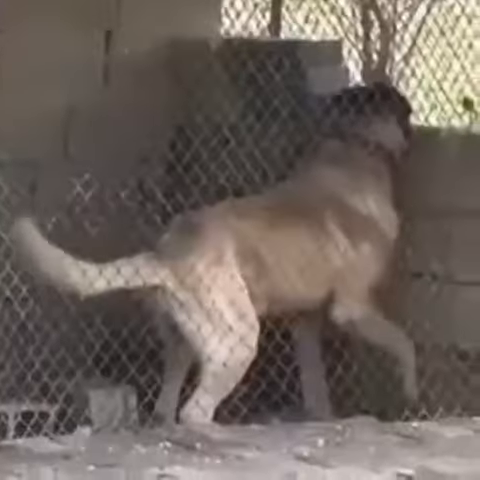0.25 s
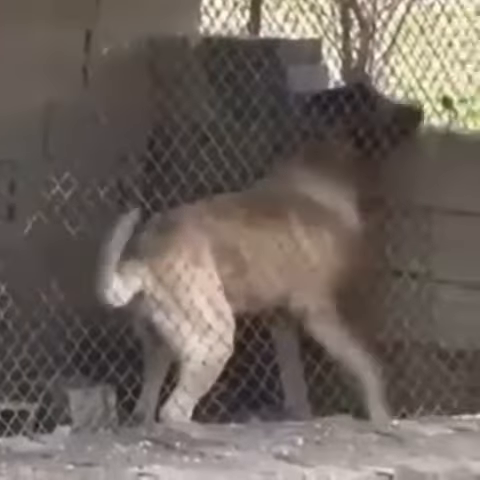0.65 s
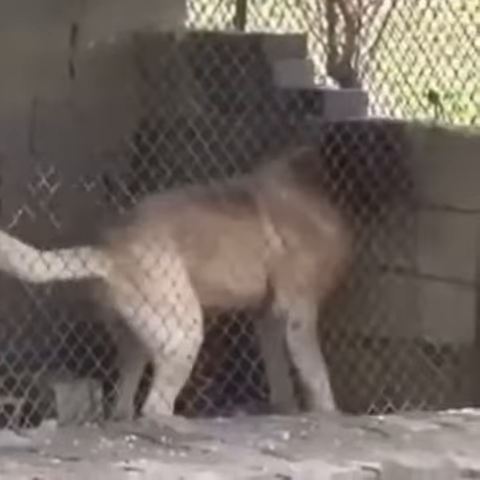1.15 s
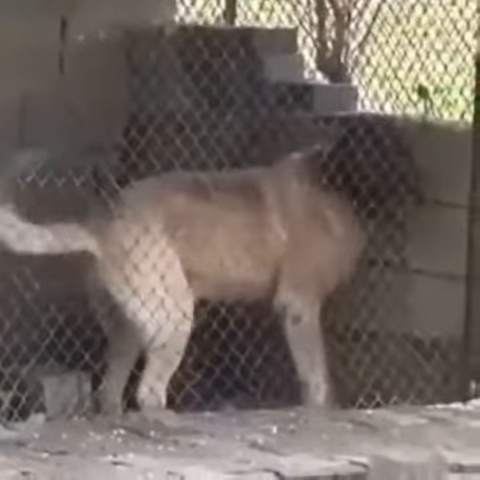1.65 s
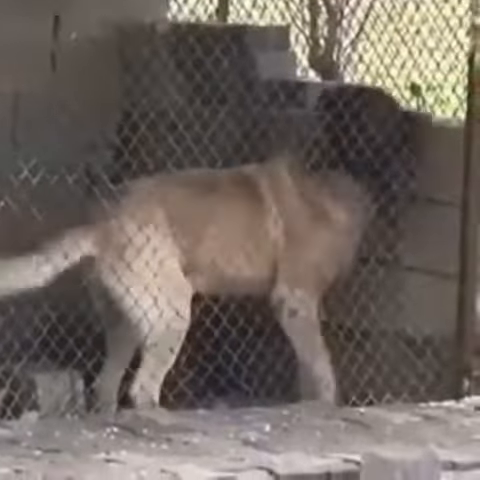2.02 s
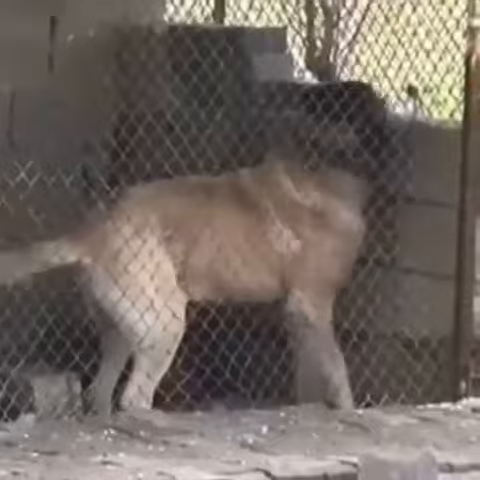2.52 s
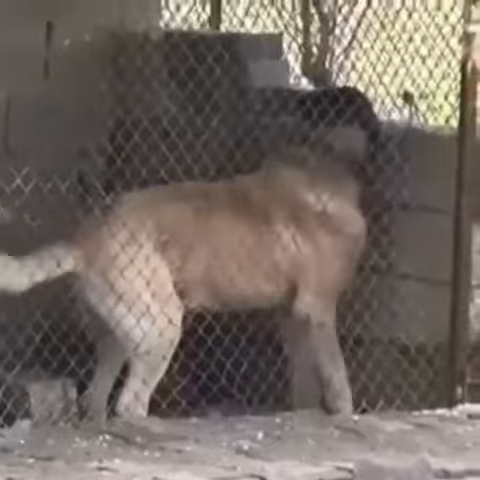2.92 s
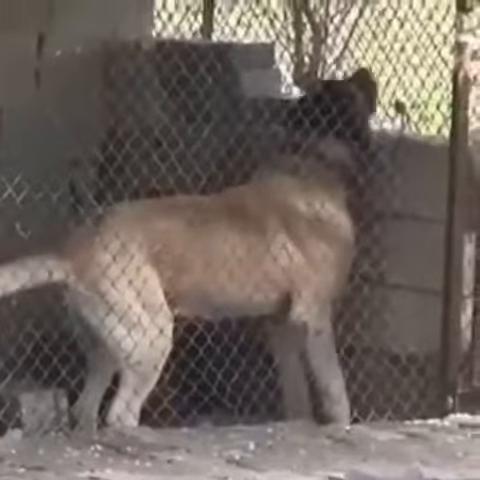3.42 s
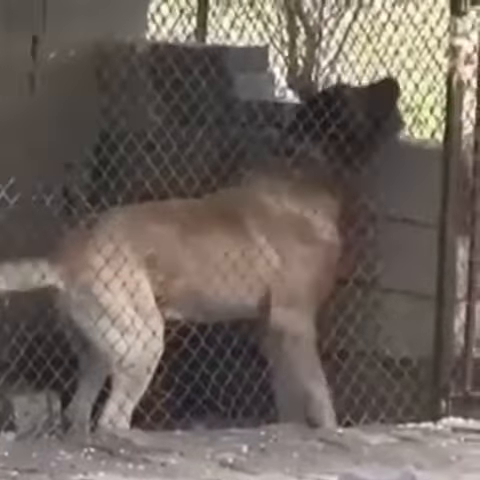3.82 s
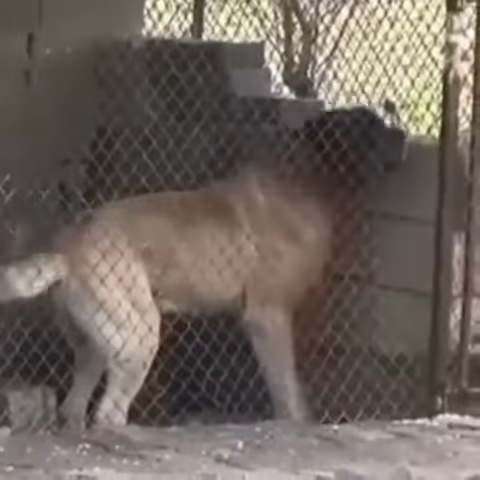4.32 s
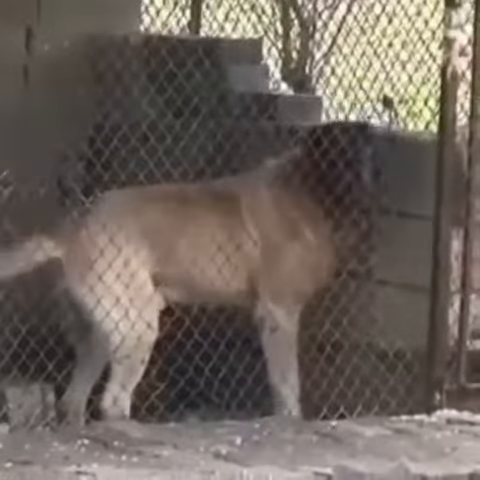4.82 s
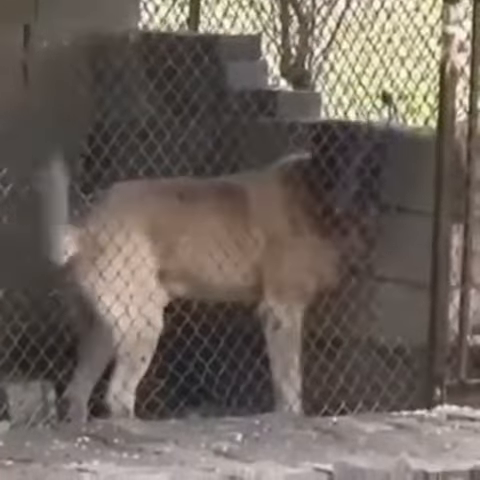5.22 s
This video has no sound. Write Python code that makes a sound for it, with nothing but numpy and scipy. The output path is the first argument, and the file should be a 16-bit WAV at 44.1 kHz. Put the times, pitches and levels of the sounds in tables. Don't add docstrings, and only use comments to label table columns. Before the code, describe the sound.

A thump and soft scuffing steps open over low distant traffic, then a tiny yip. A big dog begins barking, gruff and well spaced at first, then two barks close together and two more. From the middle on a second dog cries in gliding high whines, sometimes two-toned. Thin nose whistles, bird chirps and sharp fence ticks sit between, in an echoing outdoor pen heard through a simple handheld microphone.

```python
import sys
import numpy as np
from scipy import signal
from scipy.fft import rfft, irfft, next_fast_len
from scipy.io import wavfile
from scipy.ndimage import uniform_filter1d, map_coordinates

SR = 44100
rng = np.random.default_rng(int(sys.argv[2]) if len(sys.argv) > 2 else 0)


def level_to_linear(level):
    exponent = np.asarray(level, float) / 20
    return 10 ** exponent


def materialize(psi):
    bounded = np.clip(np.atleast_2d(psi).T, -1, 1)
    quanta = np.round(bounded * 32767).astype(np.int16)
    wavfile.write(sys.argv[1], SR, quanta)


N = 240697

# (frequency [Hz], level [dB per Hz])
RASP = [(1590, -44.5), (2700, -14.5), (3020, -4.5), (3440, -11.5), (3610, -0.5), (3950, -8.5), (4510, -1),
        (5110, -13), (9230, -13.5), (10700, -6.5), (13000, -14.5)]


def barks():
    # (chest cycles per fold pulse [1], pulse scatter [0-1], noise share [0-1],
    # undertone over chest [dB])
    voicing = [(3, 0.6, 1, -6.5), (3.5, 0.1, 0.72, -12.5), (3.3, 0.05, 0.37, -27), (3.3, 0.5, 0.8, -14),
               (3, 0.36, 0.5, -33), (4.4, 0.3, 0.71, -4), (3.9, 0.1, .65, -15), (3, 0.6, 0.7, -15)]
    # (full voice from [s], hold [s], chest level [dB], swell over the hold [dB], chest note [Hz])
    bark_table = [
        (0.837, 0.087, -20, 0.5, 329.3),
        (1.593, 0.091, -20, -2.5, 350.5),
        (2.273, 0.089, -18, -2, 368.8),
        (3.033, 0.084, -22.5, 1.5, 368),
        (3.548, 0.1, -26.5, 18, 316.4),
        (3.844, 0.086, -22.5, -6.5, 332.5),
        (4.644, .092, -22, -1, 348.2),
        (5.2, 0.091, -22.5, 14, 345.7),
    ]
    # (mouth level [dB], swell over the hold [dB], snout over mouth [dB],
    # jaw resonance [Hz], its fall over the hold [Hz])
    jaw_table = [(-25.5, 6, -15, 625, 6), (-22, 1, -15, 700, 60), (-23.5, 0, -3.5, 760, 191),
                 (-23, 8, -12.5, 670, 17), (-33.5, 16, -4.5, 660, 1), (-25, 2.5, -13.5, 620, 0.5),
                 (-22, -3, -9.5, 660, 19.5), (-26, -2.5, -17, 745, -42.5)]
    # (frequency [Hz], level [dB])
    mouth = [(500, 0.5), (620, 5.5), (770, -0.5), (880, -17.5)]
    # (frequency [Hz], level [dB])
    snout = [(1030, 3.5), (1230, 6), (1410, 6), (1620, -2.5), (1850, -14.5), (2240, -8.5)]
    # (frequency [Hz], level [dB])
    throat = [(3620, -7), (4250, 0), (4550, -1)]
    # (frequency [Hz], level [dB per Hz])
    hiss = [(420, -44.5), (520, 6.5), (800, 1.5), (1100, -1), (1500, -10), (1900, -33), (2600, -33),
            (3200, -57)]
    wander = 0.036
    over_db = -2

    out = np.zeros(N)
    for bark, opening, (cycles, scatter, share, under_db) in zip(bark_table, jaw_table, voicing):
        controls = bark_controls(bark, opening)
        start, gate, (hz, chest_db, mouth_db, snout_db, rasp_db, jaw_hz) = call(controls, release=0.03)
        size = len(gate)

        chest = turns(hz * (1 + wander * share * wobble(size, 25.6)))
        folds = chest / cycles + 2 * np.pi * scatter * wobble(size, 90)
        pulses = np.diff(np.floor(folds / (2 * np.pi)), prepend=0).clip(0, 1)
        pulses = pulses * level_to_linear(1.3 * wobble(size, 150))
        puffs = (12 + np.cos(folds)) * level_to_linear(3.9 * wobble(size, 56.6))
        air = unit(puffs * rng.standard_normal(size))
        source = np.sqrt(1 - share) * unit(pulses) + np.sqrt(share) * air

        chest_gain = level_to_linear(1.5 * np.cos(folds) + 1.8 * share * wobble(size, 70))
        chest_tone = np.sqrt(2) * chest_gain * np.sin(chest + 1.1 * share ** 2 * wobble(size, 60))
        under = fuzzy(hz * (1 - 1 / cycles), size, drift=0.015, blur=1.72 * share, flicker_db=2.5)
        over = fuzzy(hz * (1 + 1 / cycles), size, drift=0.019, blur=1.52 * share, flicker_db=3.5)
        voice = chest_tone + level_to_linear(under_db) * under + level_to_linear(under_db + over_db) * over

        throb = 1 + 0.5 * np.cos(folds)

        def bands(modes):
            lines = [level_to_linear(db) * fuzzy(centre, size, drift=0.035, blur=0.3 + (centre / 1500) ** 2, flicker_db=3)
                     for centre, db in modes]
            return unit(throb * sum(lines))

        jaw = fuzzy(jaw_hz, size, drift=0.022, blur=0.7, flicker_db=2)
        bed = unit(filtered(source, lambda f: level_to_linear(along(hiss, f))))
        rasp = unit(filtered(air, lambda f: level_to_linear(along(RASP, f)))) + level_to_linear(-4.5) * bands(throat)
        upper = level_to_linear(-6) * bands(mouth) + level_to_linear(-4) * jaw + level_to_linear(-7) * bed
        upper += level_to_linear(snout_db - 5.5) * bands(snout) + level_to_linear(rasp_db) * rasp
        out[start:start + size] += gate * (level_to_linear(chest_db) * voice + level_to_linear(mouth_db) * upper)
    return band(out, 224, 11000)


def bark_controls(bark, opening):
    s, hold, db, swell_db, hz = bark
    mouth_db, mouth_swell_db, snout_db, jaw_hz, fall_hz = opening
    edges = (0.058, 36.5, 0.073, 34)
    t, chest = note(s, hold, db, swell_db, edges)
    early, mouth = note(s - 0.0074, hold, mouth_db, mouth_swell_db, edges)
    times = np.sort(np.r_[t, early[1:3]])
    edge = np.array([1, 0, 0, 1])
    shapes = [
        (t, hz - 15.8 * edge),
        (t, chest),
        (early, mouth),
        (t, snout_db + 4 * edge),
        (t, -32.5 + 9 * edge),
        (t, jaw_hz + fall_hz * np.array([1, 1, -1, -1]) / 2),
    ]
    return np.transpose([times] + [np.interp(times, *shape) for shape in shapes])


def whines():
    tone, phase, gain = high_oscillator()
    return tone + low_oscillator(phase, gain)


def high_oscillator():
    # (time [s], pitch [Hz], effort [dB], octave over the first partial [dB])
    whine_table = [
        [(3.7, 903, -39, 6), (3.735, 780, -33, -18), (3.802, 770, -47.5, -5), (3.86, 1100, -59.5, 3.5),
         (3.895, 1154, -25, -18.5), (3.956, 1166, -20.5, -12.5), (4.0, 1134, -35.5, -25), (4.05, 886, -57.5, 5),
         (4.1, 838, -63, 6)],
        [(4.09, 829, -69.5, -13), (4.134, 895, -54, 7), (4.21, 1107, -47.5, -17), (4.244, 1145, -31.5, -14),
         (4.29, 1119, -33.5, -13), (4.326, 1077, -54.5, -7), (4.366, 1008, -50, -5.5), (4.55, 1038, -58, 3),
         (4.67, 1136, -48, -5)],
        [(4.66, 1129, -46.5, -2.5), (4.87, 1106, -38, -22.5), (4.99, 1004, -50, -16.5), (5.085, 995, -50, -18),
         (5.125, 975, -44.5, 4.5), (5.21, 900, -35.5, -7.5), (5.265, 861, -27, -37.5), (5.36, 721, -45.5, -3.5),
         (5.41, 708, -73, 5.5)],
    ]
    bright_table = [-7, 2, 1]
    # (frequency [Hz], level [dB])
    overtones = [(2300, -12), (3300, -3), (4000, -1), (4700, -8), (5500, -10), (6300, -12), (7200, -14),
                 (9000, -30)]

    out, high, high_gain = np.zeros(N), np.zeros(N), np.zeros(N)
    for rows, bright_db in zip(whine_table, bright_table):
        start, gate, (hz, first_db, octave_db) = call(rows)
        size = len(gate)
        span = slice(start, start + size)
        second_db = first_db + octave_db
        glide = abs(np.gradient(hz)) * SR / 1000
        upper_db = -66 + bright_db + 0.34 * (first_db + 40) - 3 * glide

        phase = turns(hz * (1 + 0.0012 * wobble(size, 40.1)))
        tone = level_to_linear(first_db + 1.8 * wobble(size, 40)) * np.sin(phase)
        second = np.sin(2 * phase + 0.3 * wobble(size, 90))
        tone += level_to_linear(second_db + 2.5 * wobble(size, 28)) * second
        third = np.sin(3 * phase + 0.3 * wobble(size, 90))
        tone += level_to_linear(upper_db + 4 * wobble(size, 20)) * third
        for k in range(4, 9):
            db = upper_db + along(overtones, k * hz) - 3 + 5.5 * wobble(size, 16)
            tone += level_to_linear(db) * np.sin(k * phase + 0.5 * wobble(size, 90))

        haze = unit(filtered(rng.standard_normal(size), lambda f: level_to_linear(along(RASP, f))))
        tone += level_to_linear(upper_db + 1 + 0.21 * (first_db + 40.5) + 2.7 * wobble(size, 13.1)) * haze
        tone += level_to_linear(first_db - 22) * unit(band(rng.standard_normal(size), 720, 1900))
        out[span] += np.sqrt(2) * gate * tone
        high[span], high_gain[span] = phase, level_to_linear(first_db)
    return out, high, high_gain


def low_oscillator(high, high_gain):
    # (full from [s], hold [s], level [dB], swell [dB], pitch [Hz])
    drone = [
        (3.931, 0.089, -31, 0, 754.4),
        (4.2, 0.15, -49.5, -4.5, 769),
        (4.554, .15, -46, 4.5, 774),
        (4.769, .11, -28, 9, 795.7),
        (5.002, 0.12, -61, 6, 782),
    ]
    coupling = [-30.5, -19, -19, -13, -18.5]
    # (attack [s], attack [dB], release [s], release [dB])
    drone_edges = (.03, 35, .07, 17.6)

    out = np.zeros(N)
    for (s, hold, level_db, swell_db, hz), mix_db in zip(drone, coupling):
        start, gate, (db,) = call(np.transpose(note(s, hold, level_db, swell_db, drone_edges)))
        size = len(gate)
        span = slice(start, start + size)
        rough = np.clip((-30.5 - level_db) * 1.1, 0, 1)
        hz = hz * (1 + 0.0012 * (db - db.max()))
        db = db + 5 * rough * wobble(size, 40)
        low = turns(hz * (1 + (0.0037 + 0.022 * rough) * wobble(size, 48)))
        both = np.sqrt(level_to_linear(db) * high_gain[span])
        mixed = level_to_linear(mix_db) * np.sin(2 * high[span] - low) + level_to_linear(-24) * np.sin(high[span] + low)
        own = np.sin(low) + level_to_linear(-33) * np.sin(2 * low)
        out[span] += np.sqrt(2) * gate * (level_to_linear(db) * own + both * mixed)
    return out


def cries():
    # (time [s], pitch [Hz], effort [dB])
    yelp = [(3.55, 228, -46), (3.574, 255.6, -29.5), (3.63, 305.3, -26), (3.66, 375, -24),
            (3.705, 381, -31), (3.72, 370, -46)]
    # (frequency [Hz], level [dB])
    muzzle = [(300, -8.5), (600, -6), (780, -0.5), (950, -14), (1150, -9.5), (1450, -31), (1820, -17),
              (2300, -37.5)]
    # (time [s], pitch [Hz], effort [dB])
    yip = [(0.66, 937, -61), (0.73, 1157, -62), (0.748, 1211, -35), (0.79, 1296, -42.5), (0.81, 1335, -57),
           (0.89, 1320, -55)]
    # (frequency [Hz], level [dB])
    lips = [(1000, -15), (1250, 2.5), (2450, -10), (2720, -5.5), (3700, -37), (4950, -35), (6200, -58),
            (7500, -33)]
    # (time [s], pitch [Hz], effort [dB])
    squeak = [(1.04, 983, -64), (1.06, 927, -64), (1.11, 859, -51.5), (1.14, 797, -64), (1.165, 720, -54),
              (1.195, 699, -56.5), (1.24, 743, -49), (1.285, 835, -57), (1.3, 852, -57)]
    # (frequency [Hz], level [dB])
    palate = [(750, -0.5), (950, -13), (1450, -16), (2400, -39), (2900, -18), (3600, -9.5), (4000, -25),
              (4500, -19)]
    return glides([yelp], muzzle, 6) + glides([yip], lips, 6) + glides([squeak], palate, 5)


def whistles():
    # (time [s], pitch [Hz], effort [dB])
    whistle_table = [
        [(1.32, 2114, -68), (1.42, 2170, -65), (1.452, 2330, -45), (1.475, 2750, -51)],
        [(2.09, 2330, -81), (2.126, 2340, -52), (2.184, 2500, -69), (2.235, 2690, -70)],
        [(5.39, 2230, -74), (5.432, 2145, -59.5), (5.458, 2170, -38)],
    ]
    # (frequency [Hz], level [dB])
    nose = [(2100, -9.5), (2450, -1.5), (2700, -1), (4300, -4), (4900, -22.5), (5500, -21), (6000, -90)]
    return glides(whistle_table, nose, 2)


def paws():
    # (time [s], board level [dB], knock level [dB], grit level [dB])
    thuds = [
        (0.002, -24, -39.5, -89),
        (.07, -41, -53, -54.5),
        (0.347, -51, -47, -46.5),
        (0.458, -46, -56, -75),
        (0.612, -66, -55, -62),
        (1.902, -43.5, -54, -75),
    ]
    # (frequency [Hz], level [dB], t60 [s])
    board = [(116.9, -6, 0.57)]
    # (frequency [Hz], level [dB], t60 [s])
    knock = [(229.2, 5, 0.31), (280.4, 14, 0.12), (384, 4, 0.047)]
    # (frequency [Hz], level [dB per Hz])
    grit_colour = [(210, -48), (350, -7), (618, -13.5), (666, -15.5), (1250, -18), (1840, -36), (2240, -24),
                   (12500, -53.5), (16200, -74), (22000, -120)]

    out, t = np.zeros(N + SR), np.arange(SR // 2) / SR

    def ring(modes):
        return sum(level_to_linear(db - 60 * t / t60) * np.sin(2 * np.pi * hz * t) for hz, db, t60 in modes)

    for s, board_db, knock_db, grit_db in thuds:
        grit = unit(filtered(rng.standard_normal(len(t)), lambda hz: level_to_linear(along(grit_colour, hz))))
        grit = grit * level_to_linear(-60 * t / 0.45 + 2.5 * wobble(len(t), 50)) * (1 - np.exp(-t / 0.012))
        blow = level_to_linear(board_db) * ring(board) + level_to_linear(knock_db) * ring(knock) + level_to_linear(grit_db) * grit
        out[round(s * SR):][:len(t)] += blow * (1 - np.exp(-t / 0.0034))
    return out[:N]


def fence():
    # (time [s], peak level [dB], centre frequency [Hz])
    ticks = [(0.9342, -41, 4700), (1.1824, -62, 3450), (1.7423, -51, 4170), (1.8944, -54, 4430),
             (1.9445, -53, 3910), (2.5176, -62, 5210), (3.209, -59, 7460), (4.1573, -55, 3850),
             (4.3773, -46, 3040), (4.4926, -31, 5120), (5.2269, -43, 4270)]
    out, t = np.zeros(N + SR), np.arange(800) / SR
    for s, db, hz in ticks:
        snap = rng.standard_normal(len(t)) * level_to_linear(-60 * t / 0.01)
        snap = filtered(snap, lambda f: 1 / (1 + ((f - hz) / 3000) ** 2) + 0.99)
        snap = band(snap, 1000, 15000)
        out[round(s * SR):][:len(t)] += level_to_linear(db) * snap / abs(snap).max()
    return out[:N]


def bird():
    # (time [s], length [s], from pitch [Hz], to pitch [Hz], level [dB])
    chirps = [
        (0.595, 0.071, 2810, 2950, -68.5),
        (1.265, .045, 3050, 3900, -54.5),
        (1.298, .03, 3560, 2520, -54),
        (1.451, .035, 2570, 3290, -52.5),
        (2.493, 0.034, 2900, 2700, -69),
    ]
    calls = []
    for s, length, hz, to_hz, db in chirps:
        calls.append([(s + u * length, hz + u * (to_hz - hz), db - 13.5 * abs(2 * u - 1))
                      for u in (0, 0.5, 1)])
    return glides(calls, [(1, 0)], 1)


def traffic():
    # (frequency [Hz], level [dB per Hz])
    hum_colour = [(12, -57), (24, 0), (62, -6), (107, 2.5), (195, -13), (229, -6), (363, -7), (503, -17.5),
                  (546, -20.5), (1050, -19.5), (2000, -31.5), (2490, -33.5), (3950, -40), (4400, -37.5),
                  (5040, -43), (13000, -43.5)]
    # (time [s], level [dB])
    hum_levels = [
        (0.0, -36.5),
        (0.17, -54),
        (0.64, -55),
        (1.58, -53),
        (2.39, -54.5),
        (2.64, -55.5),
        (5.21, -56.5),
        (5.46, -54.5),
    ]

    def hum():
        return filtered(rng.standard_normal(N), lambda hz: level_to_linear(along(hum_colour, hz)) * (hz < 13000))

    s, db = np.transpose(hum_levels)
    low = band(hum(), 13, 2500)
    leaves = patches(band(hum(), 2700, 13000), deep_db=2.5)
    rustle = level_to_linear(1.5 + 0.74 * wobble(N, 5.77) + 3.3 * wobble(N, 32.97))
    noise = unit(low + rustle * leaves)
    return level_to_linear(np.interp(np.arange(N) / SR, s, db) + 1 + 1.84 * wobble(N, 4.16)) * noise


def pen(x, wet_db, near_db, ring_db):
    # (frequency [Hz], t60 [s])
    decay = [(150, 0.2), (350, 1.35), (700, 1), (1800, 1.2), (5000, 1.2), (12000, 0.75)]
    # (frequency [Hz], level [dB], t60 [s])
    wall_modes = [(364, -16, 0.95), (640, -30.5, .8)]
    hz, _, z = signal.stft(rng.standard_normal(SR), SR, nperseg=512)
    t = np.arange(z.shape[1]) * 256 / SR
    tail = signal.istft(z * level_to_linear(-60 * t / along(decay, hz)[:, None]), SR, nperseg=512)[1][:SR]
    t = np.arange(SR) / SR
    near = rng.standard_normal(SR) * level_to_linear(-60 * t / 0.17)
    ring = sum(level_to_linear(db - 60 * t / t60 + 5 * wobble(SR, 23)) * np.sin(2 * np.pi * f * t)
               for f, db, t60 in wall_modes)
    answer = level_to_linear(wet_db) * tail / np.linalg.norm(tail) + level_to_linear(near_db) * near / np.linalg.norm(near)
    answer += level_to_linear(ring_db) * ring
    return signal.fftconvolve(x, np.pad(answer, (400, 0)))[:N]


def glides(calls, colour, count):
    out = np.zeros(N)
    for rows in calls:
        start, gate, (hz, db) = call(rows)
        size, phase = len(gate), turns(hz)
        tone = np.zeros(size)
        for k in range(1, count + 1):
            flicker_db = (1.5 + 0.8 * k) * wobble(size, 35)
            tone += level_to_linear(db + along(colour, k * hz) + flicker_db) * np.sin(k * phase)
        out[start:start + size] += np.sqrt(2) * gate * tone
    return out


def fuzzy(hz, size, drift, blur, flicker_db):
    phase = turns(hz * (1 + drift * wobble(size, 18))) + blur * wobble(size, 80.4)
    flicker = level_to_linear(flicker_db * (wobble(size, 24.1) + wobble(size, 68.4)))
    return unit(flicker * np.sin(phase))


def note(s, hold, db, swell_db, edges):
    attack, attack_db, release, release_db = edges
    first, last = db - swell_db / 2, db + swell_db / 2
    times = np.array([s - attack, s, s + hold, s + hold + release])
    return times, np.array([first - attack_db, first, last, last - release_db])


def call(rows, fade=0.012, release=0.016):
    s, *columns = np.transpose(rows)
    start = round(s[0] * SR)
    t = np.arange(start, min(round(s[-1] * SR), N)) / SR
    gate = np.clip(np.minimum((t - s[0]) / fade, (s[-1] - t) / release), 0, 1)
    curves = [uniform_filter1d(np.interp(t, s, c), size=400, mode="nearest") for c in columns]
    return start, gate, curves


def wobble(size, rate):
    knots = rng.standard_normal(size // 40 + 8)
    return map_coordinates(knots, [np.arange(size) * min(rate, 1000) / SR])


def patches(x, deep_db):
    z = signal.stft(x, nperseg=512)[2]
    field = uniform_filter1d(rng.standard_normal(z.shape), size=10, axis=0)
    field = uniform_filter1d(field, size=6, axis=1)
    return signal.istft(z * level_to_linear(deep_db * unit(field)), nperseg=512)[1][:len(x)]


def turns(hz):
    return 2 * np.pi * np.cumsum(hz) / SR


def filtered(x, response):
    m = next_fast_len(len(x) + SR // 2)
    return irfft(rfft(x, m) * response(np.fft.rfftfreq(m, 1 / SR)), m)[:len(x)]


def band(x, lo_hz, hi_hz):
    return signal.sosfilt(signal.butter(4, [lo_hz, hi_hz], "bandpass", fs=SR, output="sos"), x)


def along(points, hz):
    f, v = np.transpose(points)
    return np.interp(np.log(hz + 1), np.log(f + 1), v)


def unit(x):
    return x / np.sqrt(np.mean(x ** 2) + 1e-20)


def scene():
    big = barks()
    small = whines() + cries() + whistles() + bird()
    small += pen(small, wet_db=-30, near_db=-12, ring_db=-90)
    dogs = big + pen(big, wet_db=-22.5, near_db=-9.5, ring_db=-68) + small
    return (dogs + paws() + fence() + traffic())[None]


def band_limit(x):
    return signal.sosfilt(signal.butter(12, 13700, fs=SR, output="sos"), x)


def record(dry):
    top, knee = 0.35, 8
    mix = dry / (1 + abs(dry / top) ** knee) ** (1 / knee)
    return band_limit(mix)


dry = scene()
out = record(dry)
materialize(out)
```